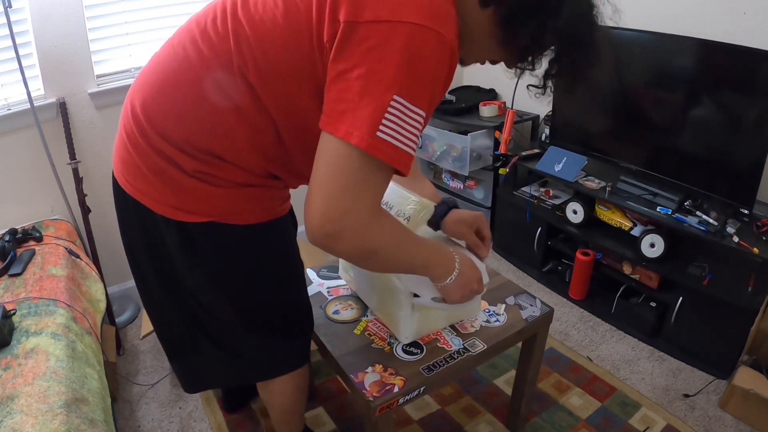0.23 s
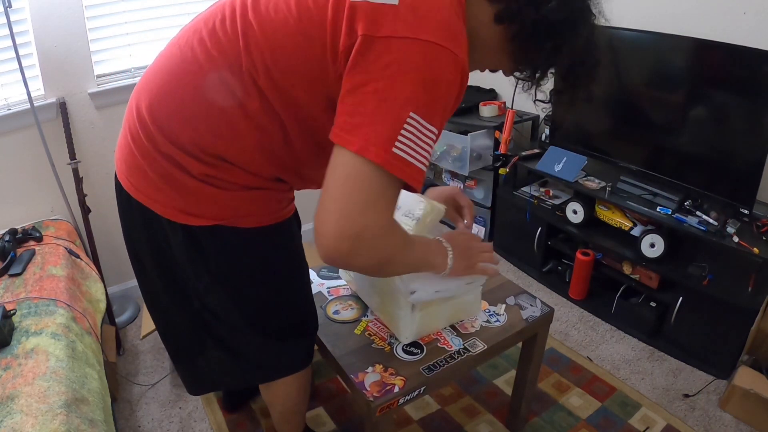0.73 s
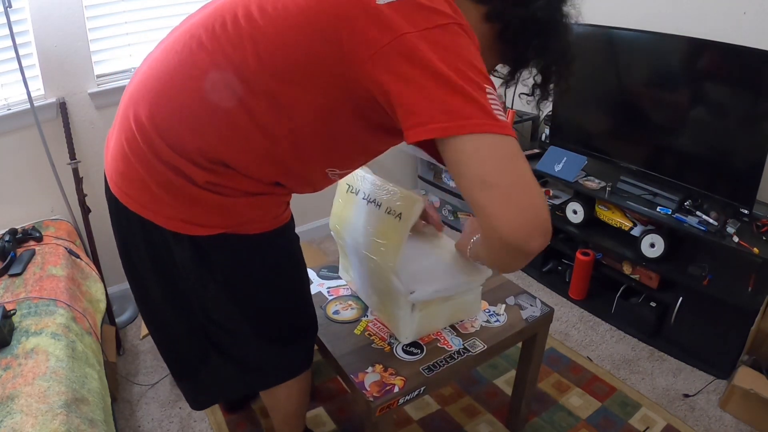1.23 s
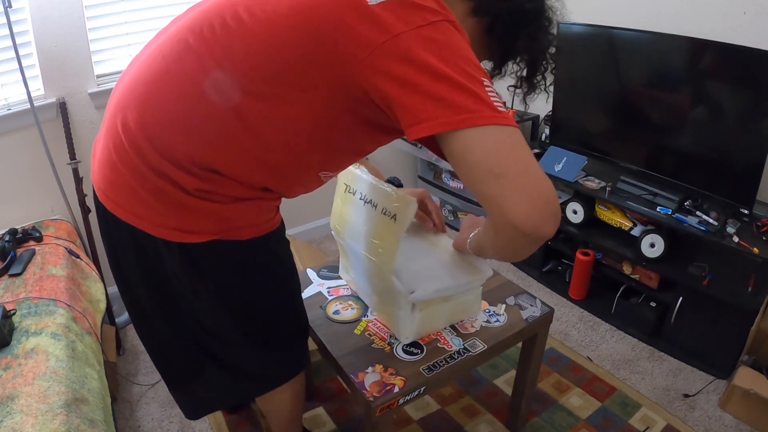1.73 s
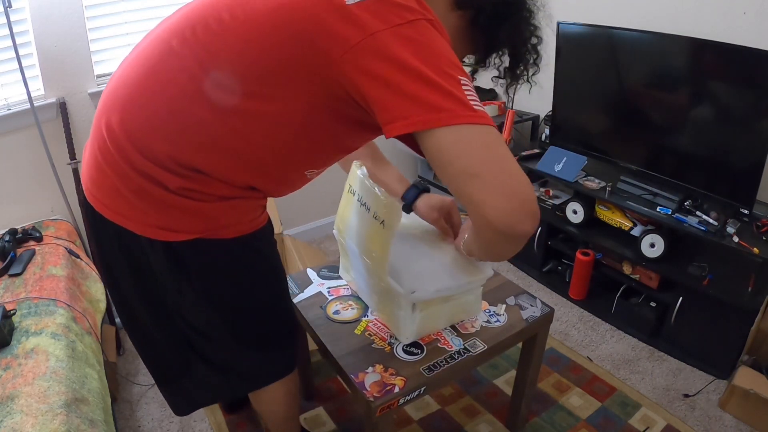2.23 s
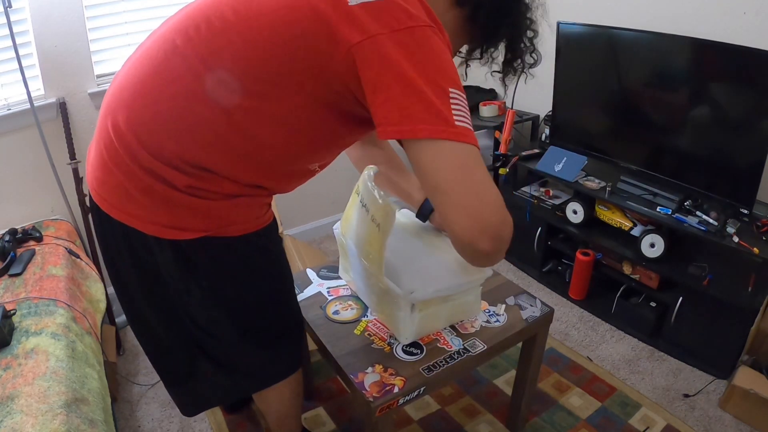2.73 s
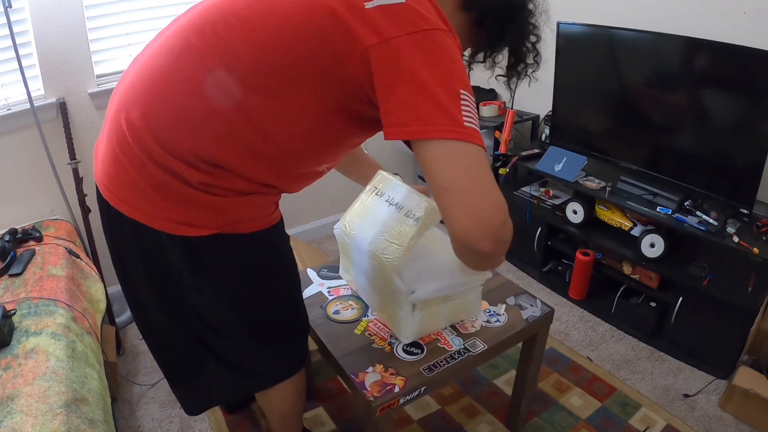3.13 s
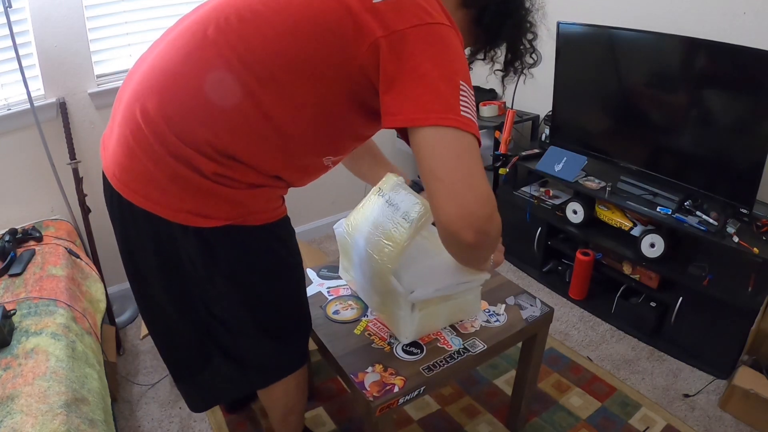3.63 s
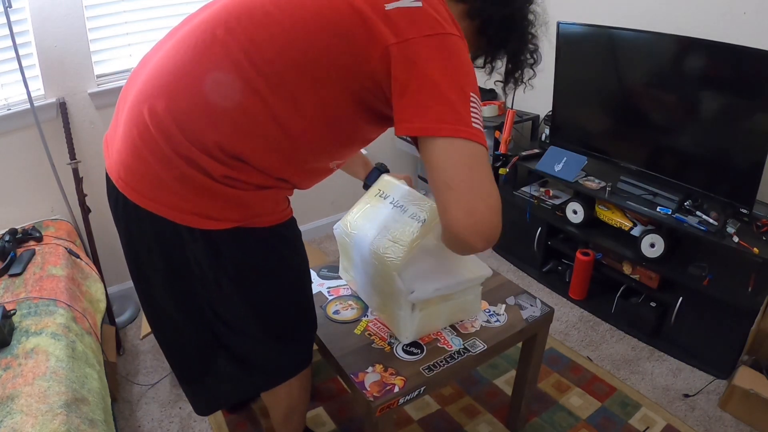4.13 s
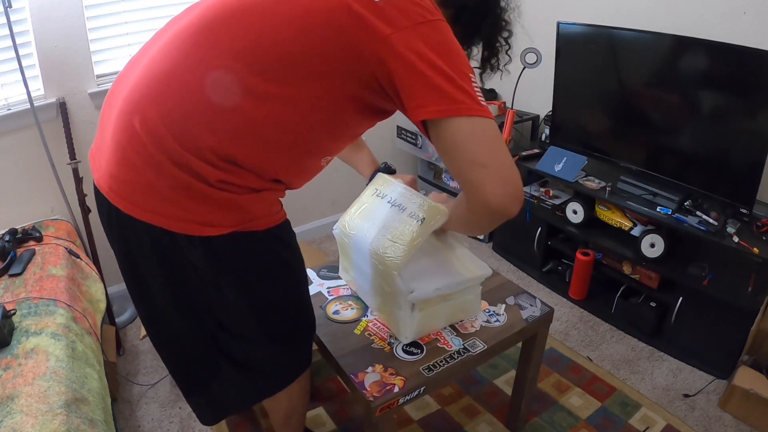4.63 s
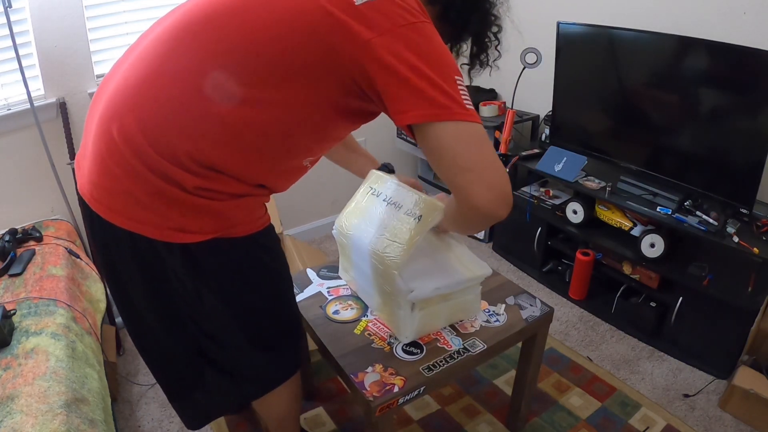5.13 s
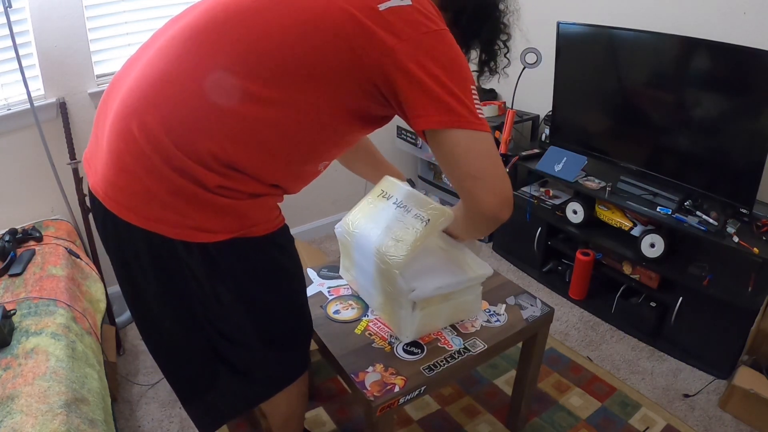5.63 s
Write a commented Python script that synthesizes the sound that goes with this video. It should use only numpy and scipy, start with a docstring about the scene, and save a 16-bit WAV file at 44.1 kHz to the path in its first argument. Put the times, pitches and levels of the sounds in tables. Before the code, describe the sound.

Hands work a foam block and its thin plastic bag on a low table. A brisk crinkle and rub comes early, then a lull, then hard snaps and a strong rustle past two and a half seconds. More pulls follow, then stiff foam cracks and a final run of dense crinkling. Small room, short ring, faint hum, close stereo camera microphone.

```python
"""A small room with a low table: hands work a foam packing block and its plastic bag loose.
The foam rubs in dense stick-slip, creaks and cracks, and its hollow booms under pressure.
The bag crinkles as small creases buckle, single large creases snap, and the block knocks dully.
Near walls answer and the room rings for under half a second, over still air and a faint mains hum.
A camera with two close ports is the microphone."""
import sys
import numpy as np
from scipy import signal
from scipy.fft import rfft, irfft, next_fast_len
from scipy.io import wavfile
from scipy.ndimage import uniform_filter1d, map_coordinates

SR = 44100
rng = np.random.default_rng(int(sys.argv[2]) if len(sys.argv) > 2 else 0)


def store_wav(level_fs):
    """Save 16-bit WAV to argv[1]."""
    pcm = np.round(np.clip(np.atleast_2d(level_fs), -1, 1) * 32767)
    wavfile.write(sys.argv[1], SR, pcm.T.astype(np.int16))


N = 259749  # length in samples

# Pulls and shoves of the hands: start_s, rise_s, hold_s, crinkle_db, sheen_db, rub_db, boom_db
HAND_STROKES = [(0.0, 0.0016, 0.042, -50, -58.5, -57.5, -58), (0.175, 0.022, 0.11, -43, -45.5, -51, -72.5),
                (0.281, 0.025, 0.0063, -25, -29.5, -33, -56), (0.32, 0.013, 0.021, -35, -35.5, -28, -57),
                (0.539, 0.017, 0.046, -44.5, -47.5, -57, -55),
                (0.62, 0.017, 0.038, -49.5, -53.5, -54.5, -55.5),
                (0.687, 0.01, 0.048, -54, -57, -53, -57.5), (0.862, 0.028, 0.075, -49.5, -53, -57, -74),
                (0.985, 0.019, 0.02, -49, -50, -56.5, -64), (1.492, 0.015, 0.037, -61.5, -60, -75.5, -86),
                (2.141, 0.0053, 0.048, -45, -56, -53.5, -59.5),
                (2.354, 0.0047, 0.0076, -43, -75, -45, -50.5),
                (2.398, 0.0025, 0.0026, -46, -68, -41.5, -40),
                (2.529, 0.047, 0.063, -34.5, -43, -38, -47.5),
                (2.714, 0.02, 0.03, -25.5, -28.5, -31, -35.5),
                (2.767, 0.011, 0.032, -34.5, -41.5, -40, -47), (2.83, 0.014, 0.072, -46.5, -53, -45, -70),
                (2.95, 0.017, 0.13, -57, -72, -66, -63), (3.219, 0.0078, 0.015, -46.5, -57, -57.5, -57),
                (3.377, 0.0037, 0.093, -55.5, -73, -73, -64), (3.504, 0.044, 0.029, -35, -39.5, -55.5, -56),
                (3.581, 0.061, 0.058, -32, -37.5, -48, -50.5), (3.642, 0.016, 0.05, -29.5, -32.5, -29, -44),
                (3.72, 0.014, 0.063, -45, -49, -48.5, -64.5), (3.802, 0.021, 0.016, -37.5, -43, -39, -45),
                (3.96, 0.04, 0.075, -55, -68, -57.5, -61), (4.255, 0.04, 0.18, -60, -63, -69.5, -79),
                (4.616, 0.018, 0.025, -49.5, -52, -70.5, -65),
                (5.325, 0.019, 0.04, -26.5, -29.5, -37.5, -69), (5.459, 0.06, 0.06, -30.5, -33, -34.5, -57),
                (5.532, 0.025, 0.027, -25.5, -29, -30.5, -40), (5.597, 0.0057, 0.043, -38, -44, -40, -73),
                (5.7, 0.014, 0.058, -35.5, -40.5, -36.5, -56),
                (5.732, 0.027, 0.025, -35, -37.5, -36.5, -43.5), (5.828, 0.018, .04, -57, -62, -54, -57)]
# Hands resting between strokes, before firmness and fidgeting: crinkle_db, sheen_db, rub_db, boom_db
RESTING_GRIP_DB = (-66, -69.5, -73.5, -77)
# Firmness of the resting grip: time_s, change_db
GRIP_FIRMNESS = [(0, 7.5), (.85, -5.5), (1.3, -1.5), (1.7, -6.5), (2.0, -6.5), (2.3, 4.5), (3.3, 1),
                 (3.95, 1.5), (4.2, -8.5), (4.55, -7), (4.93, 3.5), (5.15, 1), (5.89, 16)]
# Large creases that snap through, before the common snap gain: start_s, level_db, centre_hz
CREASE_SNAPS = [(0.0479, -32, 1910), (0.1803, -41, 4200), (0.601, -42, 2750), (0.644, -41.5, 2440),
                (0.7, -37.5, 2600), (0.974, -41, 4950), (1.0058, -49, 2050), (1.2538, -42.5, 6880),
                (1.512, -45.5, 4340), (1.612, -54.5, 1800), (1.7813, -45, 4800), (1.7996, -48, 2420),
                (1.9047, -52.5, 5200), (2.109, -35, 4960), (2.1522, -21, 4430), (2.1753, -28, 5400),
                (2.193, -48, 4810), (2.34, -42.5, 5960), (2.3609, -25.5, 5050), (2.4009, -28.5, 2100),
                (2.4788, -39.5, 6300), (2.5336, -21.5, 3300), (2.559, -29.5, 4240), (2.57, -18.5, 3700),
                (2.5926, -19, 2700), (2.5975, -22, 2450), (2.6153, -16.5, 2500), (2.7336, -17.5, 2190),
                (3.1573, -41.5, 3100), (3.4425, -40, 2540), (3.467, -50, 1900), (3.5396, -36, 2500),
                (3.834, -38, 2130), (4.017, -52, 1800), (4.2824, -47, 5600), (4.3164, -41.5, 7400),
                (4.4136, -47.5, 6500), (4.5595, -47, 4300), (5.008, -45, 5000), (5.0449, -43.5, 1830),
                (5.0969, -40, 2980), (5.1946, -42.5, 5340), (5.382, -45, 1900), (5.5625, -19, 3460)]
# Stiff foam cracking as it is bent, before the common crack gain: start_s, level_db
FOAM_CRACKS = [(4.6433, -33.5), (4.714, -32.5), (4.762, -19.5), (4.8309, -16)]
# Fingers dragging over the foam: start_s, length_s, level_db, pitch_hz
FINGER_CREAKS = [(0.301, 0.043, -31.5, 1940), (0.344, 0.054, -35.5, 890), (2.733, 0.05, -34.5, 476),
                 (2.837, .07, -48, 416), (3.233, .02, -49.5, 2350), (3.529, 0.041, -46.5, 440),
                 (3.539, 0.031, -39, 2650), (5.4, 0.092, -44, 1480), (5.537, .06, -39, 1600),
                 (5.742, 0.044, -40.5, 560)]
# Dull knocks of the block on hands and table, before the common knock gain: start_s, level_db, pitch_hz
BLOCK_KNOCKS = [(0.748, -42.5, 170), (2.401, -33.5, 510), (2.744, -39, 98), (2.887, -46.5, 198),
                (3.398, -47, 470), (3.447, -44.5, 490), (4.017, -47.5, 576), (5.585, -43.5, 100),
                (5.709, -27, 494), (5.78, -31.5, 264)]
# Colour of foam rubbing: frequency_hz, gain_db
RUB_COLOUR = [(40, -54.5), (220, -12.5), (330, -3.5), (600, 0.5), (1000, 3), (1400, -0.5), (2000, -11),
              (4000, -66)]
# Colour of the hollow block: frequency_hz, gain_db
BOOM_COLOUR = [(25, -57), (55, -33.5), (80, -8.5), (125, -4.5), (200, 2), (310, 1.5), (480, 2),
               (900, -20.5)]
# Colour of the crinkling bag: frequency_hz, gain_db
CRINKLE_COLOUR = [(500, -52.5), (1000, 1), (1500, 3.5), (2500, 2), (3800, 3.5), (5000, -1), (7000, -11),
                  (12000, -42.5)]
# Bright colour of the thin film: frequency_hz, gain_db
SHEEN_COLOUR = [(2000, -45), (4000, -5.5), (5300, 3), (7800, -2.5), (9300, -10), (11000, -11.5),
                (13300, -20), (15500, -24.5)]
# What the stiff, taut film adds to every snap: frequency_hz, gain_db
TAUT_FILM_COLOUR = [(1500, 4), (2000, -2), (2350, 3.5), (2900, -0.5), (3900, -1), (4700, -2), (8000, -2)]
# Resonances of the cracking foam: centre_hz, width_hz, gain_db
CRACK_MODES = [(1030, 440, -9), (2420, 840, -2), (3160, 630, -3), (3680, 850, -6.5)]
# Copies from the near walls and floor: delay_s, gain_db
WALL_ECHOES = [(.0098, -17), (0.0145, -7.5)]
# Time for the room to fade by 60 dB: frequency_hz, decay_s
ROOM_DECAY = [(100, 0.21), (300, 0.31), (700, 0.44), (2000, 0.38), (5000, 0.37), (13000, 0.24)]
# Room tail against the direct sound: frequency_hz, gain_db
ROOM_LEVEL = [(100, 5.5), (700, -1.5), (2500, 0.2), (8000, 0), (14000, -5.5)]
# Left-right likeness of diffuse sound at the ports: frequency_hz, correlation (0 to 1)
PORT_LIKENESS = [(100, 0.29), (300, 0.85), (1000, 0.51), (2000, 0.5), (4000, 0.4), (10000, 0.03)]
# Colour of the room air: frequency_hz, gain_db
AIR_COLOUR = [(20, -10), (60, -0.5), (130, 2.5), (220, 4), (400, -11.5), (800, -33), (1250, -14),
              (1550, 0.5), (1950, -33.5), (6000, -39.5), (14000, -25)]
# Left port's level above the right's: frequency_hz, difference_db
PORT_BALANCE = [(200, -0.5), (2000, 1.4), (8000, 1), (14000, -6)]

# A stroke swells by this much, tires while held, then lets go
RISE_DB, SAG_DB_PER_S, RELEASE_DB_PER_S = 14.5, 26.5, 470
CATCH_DB, CATCH_RATE = 1.5, 160  # the packing gives in small jerks: depth, jerks a second
FIDGET_DB, FIDGET_RATE = 5.5, 10  # the resting grip keeps shifting: depth, changes a second
FOAM_LAG_S = 0.00285  # the bag tightens first, then the foam gives
TICK_RATE, TICK_DB, TICK_HZ = 18, -57.5, 4370  # stray creases a second, typical level before snap gain, centre
TOP_HZ = 15900  # the camera's band limit


def handling():
    """Hand force as four levels in dB: each stroke swells, holds and lets go, over a shifting grip."""
    t = np.arange(N) / SR
    firm_db = np.interp(t, *np.transpose(GRIP_FIRMNESS))
    grip_db = np.array(RESTING_GRIP_DB)[:, None] + firm_db + FIDGET_DB * wobble(FIDGET_RATE)
    power = amp(grip_db) ** 2
    for start, rise, hold, *levels_db in HAND_STROKES:
        span = (t >= start) & (t < start + rise + hold + 0.2)
        since_peak = t[span] - start - rise
        swell_db = RISE_DB * np.minimum(since_peak / rise, 0)
        sag_db = SAG_DB_PER_S * np.maximum(since_peak, 0)
        release_db = RELEASE_DB_PER_S * np.maximum(since_peak - hold, 0)
        stroke_db = np.array(levels_db)[:, None] + swell_db - sag_db - release_db
        power[:, span] += amp(stroke_db) ** 2
    return 10 * np.log10(power) + CATCH_DB * wobble(CATCH_RATE)


def slips(rate, spread_db, sliding=0.067, size=700):
    """Random tiny releases, rate a second, of uneven sizes; together they give off steady power."""
    happens = rng.random(N) < rate / SR
    sizes = amp(spread_db * np.minimum(rng.standard_normal(N), 2))
    kicks = happens * rng.choice([-1, 1], N) * sizes
    kicks = kicks + sliding * rng.standard_normal(N)  # smooth sliding between the releases
    nearby_power = np.abs(uniform_filter1d(kicks ** 2, size))  # size in samples
    return kicks / np.sqrt(nearby_power + 1e-9)


def foam(level_db, hollow_db, rate=1500, spread_db=5):
    """Foam cells catch and let go, faster when pushed harder; the hollow block booms along."""
    kicks = slips(rate * amp(0.5 * (level_db + 42.5)), spread_db)
    rub = coloured(kicks * amp(level_db), RUB_COLOUR)
    boom = coloured(kicks * amp(hollow_db), BOOM_COLOUR)
    return filtered(rub + boom, lambda hz: np.exp(-2j * np.pi * hz * FOAM_LAG_S))


def bag(level_db, thin_db, rate=1500, spread_db=3.5):
    """Small creases buckle: single ticks when handled lightly, a dense rush when pulled."""
    buckles = slips(rate * amp(0.7 * (level_db + 40.5)), spread_db)
    thin = unit(amp(2.8 * rng.standard_normal(N)))  # every crease has its own brightness
    crinkle = coloured(buckles * amp(level_db), CRINKLE_COLOUR)
    sheen = coloured(buckles * thin * amp(thin_db), SHEEN_COLOUR)
    return crinkle + sheen


def snaps(level_db=19, flutter=0.22, flutter_t60=0.0063, low_db=-19, high_db=-14):
    """A large crease snaps through in one sharp pulse, and the film around it flutters for a moment."""
    track, t = np.zeros(N), np.arange(SR // 40) / SR
    for s, db, hz in CREASE_SNAPS + stray_ticks():
        kick = flutter * rng.standard_normal(len(t)) * amp(-60 * t / flutter_t60)
        kick[0] = 1
        below = [(hz / 60, -48), (hz / 3, low_db), (hz / 1.4, 0)]
        above = [(hz * 0.93, -1), (hz * 2.82, high_db), (hz * 6, -22)]
        snap = coloured(kick, below + above)
        add(track, s - 0.0003, amp(db + level_db) * snap / np.linalg.norm(snap))
    return coloured(track, TAUT_FILM_COLOUR)


def stray_ticks(spread_db=3, spread_octaves=0.35, follow=0.67):
    """Faint creases settle at random moments, louder under a firmer grip: start_s, level_db, centre_hz."""
    when, size, pitch = rng.random((round(TICK_RATE * N / SR), 3)).T
    s = when * N / SR
    firm_db = np.interp(s, *np.transpose(GRIP_FIRMNESS))
    db = TICK_DB + spread_db * (2 * size - 1) + follow * firm_db
    return list(zip(s, db, TICK_HZ * 2 ** (spread_octaves * (2 * pitch - 1))))


def cracks(level_db=17, tear_s=0.0027, echo_s=0.0046, echo_db=-8, dull_hz=5000):
    """A few cell walls tear in a quick burst that rings the stiff foam; a weaker echo off the table top follows."""
    track, t = np.zeros(N), np.arange(SR // 20) / SR

    def stiff_foam(f):
        modes = sum(amp(db) * resonance(f, hz, width) for hz, width, db in CRACK_MODES)
        return modes / np.hypot(1, (f / dull_hz) ** 2)

    for s, db in FOAM_CRACKS:
        for delay, loss_db in ((0, 0), (echo_s, echo_db)):
            # the echo has its own noise, with the same shape
            burst = rng.standard_normal(len(t)) * np.sin(np.pi * np.minimum(t / tear_s, 1))
            ring = filtered(burst, stiff_foam)
            add(track, s + delay, amp(db + level_db + loss_db) * ring / np.linalg.norm(ring))
    return track


def creaks(sharpness=8, slip_rate=600, waver=0.031, waver_rate=45, attack_s=0.0014, fade_db=7):
    """Fingers drag in uneven stick-slip, ringing one foam resonance whose pitch wavers."""
    track = np.zeros(N)
    for s, length, db, hz in FINGER_CREAKS:
        t = np.arange(round(2 * length * SR)) / SR
        kicks = (rng.random(len(t)) < slip_rate / SR) * rng.normal(1, 0.59, len(t))
        kicks[0] = 1
        pitch = hz * (1 + waver * wobble(waver_rate)[:len(t)])
        swing = np.exp(2j * np.pi * np.cumsum(pitch) / SR)
        # the decay runs at zero frequency, then turns with the wavering pitch
        keep = np.exp(-np.pi * hz / sharpness / SR)
        ring = signal.lfilter([1], [1, -keep], kicks * (t < length) / swing) * swing
        creak = ring.real * (1 - np.exp(-t / attack_s)) * amp(-fade_db * t / length)
        add(track, s, amp(db) * unit(creak) / np.sqrt(2))
    return track


def bumps(level_db=5, cycles=4):
    """A soft knock sets the block swinging for a few cycles."""
    track, t = np.zeros(N), np.arange(SR // 5) / SR
    for s, db, hz in BLOCK_KNOCKS:
        decay = amp(-60 * t / (cycles / hz + 0.021))
        onset = 1 - np.exp(-2 * hz * t)
        add(track, s, amp(db + level_db) * np.sin(2 * np.pi * hz * t) * decay * onset)
    return track


def room(x, roam_rate=110, bass_hz=340, count=6):
    """Slips come from many spots: short waves meet a different room from each, long waves the same one."""
    long_waves = lambda hz: 1 / (1 + (hz / bass_hz) ** 8)
    bass = filtered(x, long_waves)
    shares = np.array([wobble(roam_rate) for _ in range(count)])  # how much each spot sounds at each moment
    shares /= np.linalg.norm(shares, axis=0)
    roaming = sum(answer((x - bass) * share) for share in shares)
    roaming = filtered(roaming, lambda hz: 1 - long_waves(2 * hz))  # the changing part holds no deep bass
    return x + walls(x) + standing_wave(x) + answer(bass) + roaming


def walls(x, dull_hz=2500):
    """The nearest walls and the floor send back a few dull copies."""
    def echoes(hz):
        copies = sum(amp(db) * np.exp(-2j * np.pi * hz * s) for s, db in WALL_ECHOES)
        return copies / (1 + 1j * hz / dull_hz)

    return filtered(x, echoes)


def standing_wave(x, mode_hz=91, width_hz=5, mode_db=10):
    """The room's strongest low mode hums on after a thump."""
    return amp(mode_db) * filtered(x, lambda hz: resonance(hz, mode_hz, width_hz))


def answer(x, build_s=0.00054, scatter_db=-4, scatter_t60=0.016, scatter_hz=5000):
    """The room rings to one spot: treble scattered by hands and table, with a diffuse tail."""
    hz, t, z = signal.stft(rng.standard_normal((2, SR * 3 // 4)), SR, nperseg=256)
    decay = amp(-60 * t / along(ROOM_DECAY, hz)[:, None]) * (1 - np.exp(-t / build_s))
    energy = np.sum(decay ** 2, axis=1, keepdims=True) * t[1] * SR
    decay *= amp(along(ROOM_LEVEL, hz))[:, None] / np.sqrt(energy)
    tail = ports(signal.istft(z * decay, SR, nperseg=256)[1])
    tail_s = np.arange(tail.shape[1]) / SR
    scatter = rng.standard_normal(tail.shape) * amp(-60 * tail_s / scatter_t60)
    scatter /= np.linalg.norm(scatter, axis=1, keepdims=True)
    scatter = filtered(scatter, lambda f: 1j * f / (scatter_hz + 1j * f))
    return signal.fftconvolve(x[None], tail + amp(scatter_db) * scatter, axes=1)[:, :N]


def ports(pair):
    """Two unrelated signals become a diffuse field at two close ports: alike as the table says."""
    def mix(hz):
        turn = np.arccos(np.clip(along(PORT_LIKENESS, hz), -1, 1)) / 2
        return np.array([np.cos(turn), np.sin(turn)])

    mid, side = filtered(pair, mix)
    return np.array([mid + side, mid - side])


def background(air_db=-72, hum_db=-76):
    """Still room air as diffuse noise, and an appliance's slightly unsteady hum as a drifting sine."""
    noise = filtered(rng.standard_normal((2, N)), lambda hz: amp(along(AIR_COLOUR, hz)))
    air = unit(ports(noise))
    drift = 0.0058 * np.cumsum(rng.standard_normal(N))  # radians
    hum = unit(np.sin(2 * np.pi * 119.5 * np.arange(N) / SR + drift))
    return amp(air_db) * air + amp(hum_db) * hum


def amp(db):
    """Decibels to gain."""
    return 10 ** (np.asarray(db) / 20)


def unit(x):
    """Scale to rms 1."""
    return x / np.sqrt(np.mean(x ** 2) + 1e-20)


def along(points, hz):
    """Read (frequency_hz, value) points on a log axis."""
    f, v = np.transpose(points)
    return np.interp(np.log(hz + 1), np.log(f + 1), v)


def wobble(rate):
    """A smooth random curve, rate knots a second."""
    knots = rng.standard_normal(int(N * rate / SR) + 4)
    return map_coordinates(knots, [np.arange(N) * rate / SR])


def filtered(x, response):
    """x times a response of frequency."""
    m = next_fast_len(x.shape[-1] + SR // 2)
    return irfft(rfft(x, m) * response(np.fft.rfftfreq(m, 1 / SR)), m)[..., :x.shape[-1]]


def resonance(f, centre_hz, width_hz):
    """Response of one damped mode, with gain 1 at its centre."""
    return 1j * f * width_hz / (centre_hz ** 2 - f ** 2 + 1j * f * width_hz)


def impulse(spectrum, size=4096):
    """The causal pulse of energy 1 that has a given colour."""
    cepstrum = irfft(np.log(amp(along(spectrum, np.fft.rfftfreq(size, 1 / SR)))))
    cepstrum[1:size // 2] *= 2  # folding the cepstrum makes the pulse minimum-phase
    cepstrum[size // 2 + 1:] = 0
    pulse = irfft(np.exp(rfft(cepstrum)))
    return pulse / np.linalg.norm(pulse)


def coloured(x, spectrum):
    """Ring x through a body of the given colour."""
    return signal.fftconvolve(x, impulse(spectrum))[:len(x)]


def add(track, s, sound):
    """Mix a sound into the track at time s."""
    part = track[max(0, round(s * SR)):][:len(sound)]
    part += sound[:len(part)]


def scene():
    """The handling sounds in the room, over its quiet background."""
    crinkle_db, sheen_db, rub_db, boom_db = handling()
    packing = foam(rub_db, boom_db) + bag(crinkle_db, sheen_db)
    events = snaps() + cracks() + creaks() + bumps()
    return room(packing + events) + background()


def record(dry, lag_s=0.00004, rolloff_hz=13800):
    """Sound reaches the left port a moment later; the camera rolls off the top up to its band limit."""
    sides = np.array([[0.5], [-0.5]])  # left, right

    def placement(hz):
        return amp(sides * along(PORT_BALANCE, hz)) * np.exp(-2j * np.pi * hz * sides * lag_s)

    heard = filtered(dry, placement)
    return filtered(heard, lambda hz: (hz < TOP_HZ) / (1 + (hz / rolloff_hz) ** 20))


dry = scene()
out = record(dry)
store_wav(out)
```